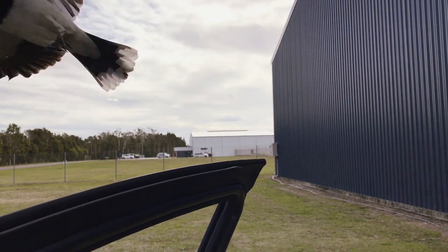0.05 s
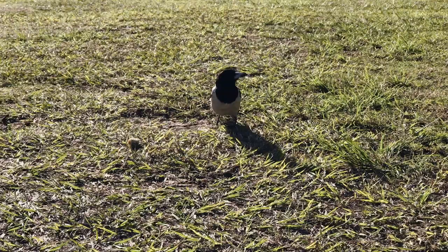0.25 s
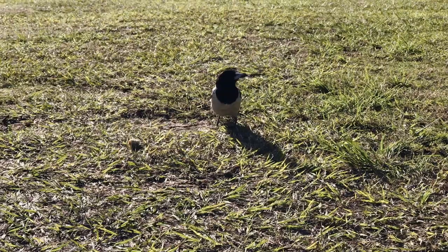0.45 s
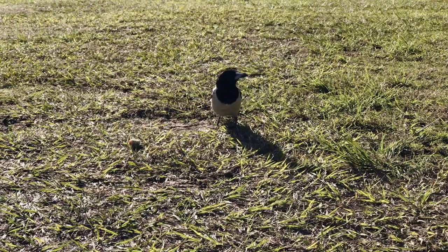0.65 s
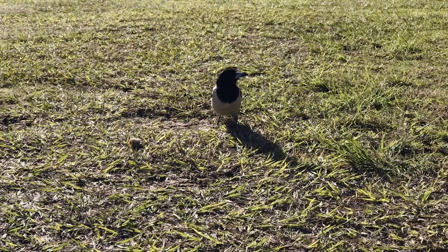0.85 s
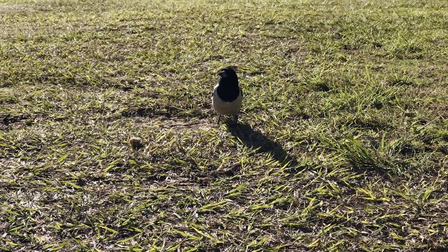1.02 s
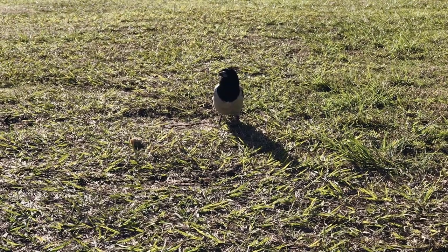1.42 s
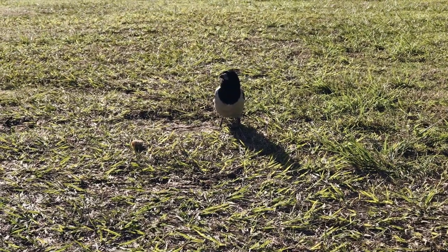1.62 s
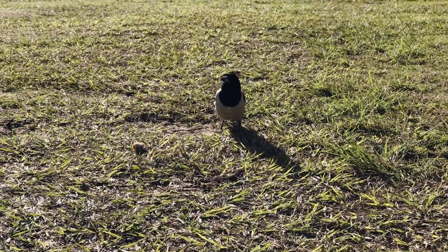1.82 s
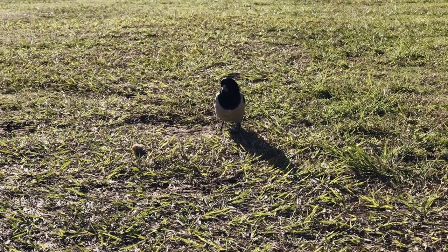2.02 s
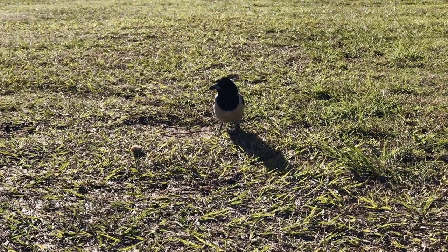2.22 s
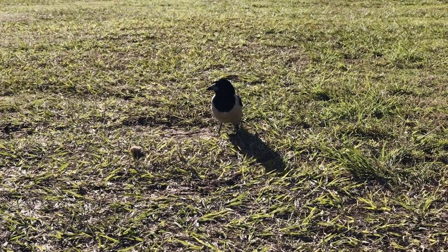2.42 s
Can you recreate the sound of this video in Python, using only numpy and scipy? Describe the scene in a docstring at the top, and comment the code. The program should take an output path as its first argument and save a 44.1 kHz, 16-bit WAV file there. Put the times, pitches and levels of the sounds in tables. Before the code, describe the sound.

A bird flutters off close by, its wings making low thumps of air with a light feather rustle from 0.2 to 0.3 seconds, just after one soft, short whistle. A faint hiss fades by 0.7 seconds, and two softer bumps come near 0.8. From 0.6 until the end at about 2.5 seconds, distant birds give quiet falling whistles, sharp chips and harsh calls, echoing slightly over a faint outdoor rumble.

```python
"""Over a faint outdoor rumble and a brief hiss, a butcherbird close by gives one soft, arched whistle.
It flutters off: its feathers rustle by friction and its wings push low buffets of air.
Other birds answer from farther off with falling whistles, harsh calls and sharp chips, reflected
by a shed wall and scattered by the surroundings. A second, softer pair of bumps comes near 0.8 s,
and the far birds call on to the end."""
import sys
import numpy as np
from scipy import signal
from scipy.fft import rfft, irfft
from scipy.io import wavfile
from scipy.ndimage import uniform_filter1d

SR = 44100
rng = np.random.default_rng(int(sys.argv[2]) if len(sys.argv) > 2 else 0)


def unload_wav(signal):
    """Save mono or channel-first audio to the path in sys.argv[1] as 16-bit WAV at rate SR, clipped to [-1, 1]."""
    wavfile.write(
        sys.argv[1],
        SR,
        np.round(np.clip(np.atleast_2d(signal).T, -1, 1) * 32767).astype(np.int16),
    )


N = 112454


def undb(db):
    """Amplitude ratio of a level in decibels."""
    return 10 ** (np.asarray(db) / 20)


def unit(x):
    """Normalisation to rms 1."""
    return x / np.sqrt(np.mean(x ** 2))


def curve(rows):
    """Linear interpolation between (t/s, value) rows."""
    return np.interp(np.arange(N) / SR, *np.array(rows).T)


def swells(rows):
    """Sum of Gaussian envelopes from (t/s, standard deviation/s, level/dB) rows."""
    t = np.arange(N) / SR
    return sum(undb(db) * np.exp(-.5 * ((t - at) / width) ** 2) for at, width, db in rows)


def colour(x, points):
    """Zero-phase filtering: the spectrum is multiplied by a curve through (f/Hz, gain/dB) points."""
    hz, db = np.array(points).T
    f = np.maximum(np.fft.rfftfreq(len(x), 1 / SR), 1)
    gain = undb(np.interp(np.log(f), np.log(hz), db))
    return irfft(rfft(x) * gain, len(x))


def noise(points):
    """Gaussian noise of rms 1, spectrally shaped by (f/Hz, level/dB) points."""
    return unit(colour(rng.standard_normal(N), points))


def wander(rate_hz):
    """Random modulation of rms 1: straight ramps between independent values."""
    hold = max(int(SR / rate_hz), 1)
    steps = np.repeat(rng.standard_normal(N // hold + 1), hold)
    return unit(uniform_filter1d(steps, hold)[:N])


def tail(x, t60_s):
    """Diffuse reverberation: convolution with exponentially decaying noise of unit energy."""
    t = np.arange(SR) / SR
    response = rng.standard_normal(SR) * np.exp(-np.log(1000) * t / t60_s)
    return signal.fftconvolve(x, response / np.linalg.norm(response))[:N]


def rumble():
    """Outdoor rumble: low-frequency noise under slow amplitude modulation."""
    # spectrum of the rumble: f/Hz, relative level/dB
    spectrum = [(20, -56), (32, -46), (50, -5.5), (90, -4), (140, -0.5), (200, 3.5), (290, 1), (420, -6),
                (600, -9.5), (850, -15.5), (1100, -17), (1600, -21), (2600, -23), (3800, -29), (5300, -34),
                (7300, -39.5), (12000, -45.5), (15500, -45.5)]
    # its gentle swells: t/s, level/dB
    envelope = [(0, -71), (.6, -69.5), (.75, -64.5), (.98, -69.5), (1.28, -66.5), (1.4, -70), (1.7, -67),
                (2.1, -67.5), (2.55, -67.5)]
    flicker_db = 0.7
    return noise(spectrum) * undb(curve(envelope) + flicker_db * wander(11))


def hiss():
    """Broadband noise whose envelope rises at the start and drops away near 0.65 s."""
    # spectrum of the hiss: f/Hz, relative level/dB
    spectrum = [(60, -28), (200, -11), (380, 2), (520, 3), (800, -3), (1100, -3.5), (1600, -9), (2600, -14),
                (4100, -17), (5600, -19), (7700, -24), (9000, -21.5), (10400, -30), (12500, -24),
                (15500, -23)]
    # its rise and fall: t/s, level/dB
    envelope = [(0, -91), (.05, -77), (.09, -68.5), (.33, -68.5), (.5, -70.5), (.648, -72), (.675, -100)]
    return noise(spectrum) * undb(curve(envelope))


def tone(hz, octave_db=-39):
    """A nearly pure bird tone with a faint second harmonic; phase is the integral of frequency."""
    phase = 2 * np.pi * np.cumsum(hz) / SR
    return np.sqrt(2) * (np.sin(phase) + undb(octave_db) * np.sin(2 * phase))


def butcherbird():
    """Frequency and amplitude modulation of one tone: an arched whistle that swells on its way down."""
    # fundamental of the whistle: t/s, f/Hz
    pitch = [(0, 1110), (.02, 1410), (.042, 1450), (.062, 1370), (.08, 1242), (.098, 1293), (.106, 1020),
             (.125, 1043)]
    # its envelope: t/s, level/dB
    envelope = [(0, -71.5), (.018, -60.5), (.036, -60), (.05, -66.5), (.056, -49.5), (.07, -47.5),
                (.088, -62.5), (.101, -81), (.106, -56), (.113, -62), (.125, -73)]
    end_s, fade_s = envelope[-1][0], 0.007
    fade = np.clip((end_s - np.arange(N) / SR) / fade_s, 0, 1)
    return tone(curve(pitch)) * undb(curve(envelope)) * fade


def far_whistle(hz, rough_db=-6):
    """A clear tone with a rough edge of narrow-band noise; being incoherent, the two add in power."""
    voice = tone(hz) + undb(rough_db) * hoarse(hz, half_width_hz=190)
    return voice / np.hypot(1, undb(rough_db))


def hoarse(hz, half_width_hz=534):
    """A harsh voice: random modulation of amplitude and phase spreads a tone into a band."""
    band = [(half_width_hz / 2, 0), (half_width_hz, -6),
            (2 * half_width_hz, -30), (10 * half_width_hz, -90)]  # offset f/Hz, level/dB
    in_phase = unit(colour(rng.standard_normal(SR // 4), band))[:len(hz)]
    quadrature = unit(colour(rng.standard_normal(SR // 4), band))[:len(hz)]
    phase = 2 * np.pi * np.cumsum(hz) / SR
    return in_phase * np.sin(phase) + quadrature * np.cos(phase)


def far_birds():
    """Frequency glides, clear or harsh, heard as the superposition of direct and reflected sound."""
    # falling whistles: t/s, duration/s, start f/Hz, end f/Hz, level/dB,
    # bend (above 0 glides early), gain into the echoes/dB
    whistles = [ (0.057, 0.044, 5750, 4320, -82, 1.5, -3), (.098, 0.023, 4260, 4020, -74, .5, -18),
                (.23, 0.022, 3295, 2950, -79.5, 0, 6.5), (.626, 0.083, 4150, 3370, -74.5, 3.5, -5),
                (.655, 0.037, 4130, 3670, -74, .3, -1), (.7, 0.052, 3810, 3516, -69.5, 0.1, -3),
                (0.713, 0.095, 3115, 2816, -73, 4, -0.5), (0.778, 0.058, 2950, 2137, -71, -2, -5.5),
                (.808, 0.073, 2070, 1916, -67.5, 1, -8), (0.782, 0.11, 3234, 1950, -65, 0, -17.5),
                (0.994, 0.061, 5120, 4750, -76, -3.2, -1), (1.008, .075, 5440, 4580, -72, 1.6, -5),
                (1.05, 0.052, 4350, 3800, -72.5, 3, 8), (1.017, 0.12, 4550, 3236, -74.5, 2.4, -2),
                (1.088, .09, 4036, 3420, -63.5, 2, -13), (1.197, 0.076, 2974, 1814, -65, 0.3, -6),
                (1.228, 0.041, 2965, 2540, -57.5, 1, -27.5), (1.266, .036, 2500, 2066, -68.5, 1.2, -13),
                (1.422, 0.091, 3420, 3200, -71, 6.7, -14), (1.531, 0.046, 4050, 3410, -68.5, 2.5, -10),
                (1.578, 0.029, 2980, 2570, -76, 2, -10), (1.613, 0.034, 3150, 2570, -73.5, 0, 1),
                (1.593, 0.12, 2190, 2072, -72.5, -1, -2.5), (1.665, .045, 2163, 1804, -70, 0.5, 2),
                (1.604, .11, 4780, 3330, -67.5, 1.5, -1), (1.622, 0.027, 5540, 5220, -80, -0.5, 3),
                (1.642, 0.064, 4420, 3840, -70.5, 0.5, -9), (1.659, .04, 5620, 5190, -80.5, .8, 12),
                (1.692, .095, 3960, 3140, -63.5, 1.5, -6.5), (1.843, 0.029, 3080, 2560, -79, 0, -1),
                (1.878, 0.037, 3220, 2400, -77.5, -0.5, 1), (1.88, 0.1, 4740, 3300, -68, 2.5, -5),
                (1.9, 0.1, 6380, 5260, -79, 3, 7.5), (1.956, 0.058, 3720, 3330, -65, 2.3, -6),
                (2.143, 0.043, 4650, 3720, -84.5, 8.5, 17), (2.24, 0.066, 3640, 3304, -67.5, 0, -1.5),
                (2.39, 0.039, 3050, 2220, -80, -1, -5), (2.422, 0.042, 3130, 2200, -75.5, .4, -20),
                (2.422, 0.14, 4600, 3240, -72.5, 2.6, -1), (2.447, .03, 4840, 4530, -79.5, 4.5, -5),
                (2.478, 0.068, 4490, 3466, -64, 3.5, 1), (2.485, 0.036, 4800, 4050, -73.5, 2.3, 3)]
    # quick chips, a few of them rising: columns as above
    chips = [ (0.719, 0.025, 4980, 5970, -73, 1.2, -11), (.742, .016, 5310, 5700, -70.5, 1.8, -30),
             (.743, 0.0067, 3600, 4420, -64.5, 0.2, -17), (1.483, 0.022, 4690, 2900, -61.5, 2.4, -4),
             (1.488, 0.016, 5750, 5280, -77.5, 0.8, 2), (1.507, 0.02, 5750, 4980, -72, .4, -7.5),
             (1.518, 0.012, 4450, 3550, -68, 1.0, -5.5), (1.527, 0.0087, 3600, 2980, -58, -0.75, -12),
             (1.677, 0.032, 5620, 4000, -68.5, 1.5, 3), (1.917, .018, 5790, 4910, -69.5, 1.2, 4),
             (2.026, .011, 4010, 2730, -56.5, -0.13, -6), (2.117, 0.033, 3870, 2586, -58.5, -0.64, -4.5),
             (2.181, 0.024, 4400, 3820, -65, 1.2, -4.5), (2.188, .05, 4050, 1996, -53.5, 1.1, -13),
             (2.219, 0.033, 3350, 2247, -64, 1.7, -21), (2.31, 0.0072, 5940, 3880, -80.5, -0.16, -5),
             (2.339, 0.0093, 6000, 5250, -84.5, .6, -1), (2.35, 0.01, 4540, 3770, -78, -0.0052, 1),
             (2.359, 0.011, 3760, 3330, -62.5, 0.77, -15), (2.47, 0.0076, 4490, 3770, -62, 0.74, -11)]
    # harsh falling calls: columns as above
    rasps = [ (.69, 0.12, 3780, 2766, -76, .2, 0), (1.025, 0.11, 4890, 3705, -67, 1.4, -8),
             (1.045, 0.055, 6820, 6300, -87, 0.39, -1), (1.08, 0.12, 4200, 3556, -69, 0.798, -3.5),
             (1.42, 0.1, 6440, 5930, -96, 0.78, 4), (1.672, 0.15, 5000, 4070, -70.5, 0.92, -5.5),
             (1.65, .13, 3925, 2863, -75, 0.513, -5), (1.69, 0.049, 6900, 5900, -86, 0.55, 5),
             (1.925, .115, 5040, 3950, -66, 1.4, -2.5), (1.93, 0.096, 6350, 5540, -79.5, 0.49, -5),
             (1.98, .1, 3290, 2683, -73, .5, -1.5), (2.195, 0.081, 3855, 3140, -65.5, 1, -11)]
    slow_attack, chip_attack, release = 0.37, 0.3, 0.5  # fractions of a note's duration
    waver = 1 + 0.014 * wander(500)
    tremor = undb(1.5 * wander(160))
    direct, to_echoes = np.zeros((2, N + SR))
    calls = (whistles, far_whistle, slow_attack), (chips, tone, chip_attack), (rasps, hoarse, slow_attack)
    for rows, voice, attack in calls:
        for start, duration, start_hz, end_hz, db, bend, echo_db in rows:
            progress = np.linspace(0, 1, int(duration * SR))
            span = int(start * SR) + np.arange(len(progress))
            glide = np.cumsum(np.exp(-bend * progress))
            hz = (start_hz + (end_hz - start_hz) * glide / glide[-1]) * waver[span % N]
            ramp = np.clip(np.minimum(progress / attack, (1 - progress) / release), 0, 1)
            envelope = undb(db) * np.sin(np.pi / 2 * ramp) * tremor[span % N]
            note = envelope * voice(hz)
            direct[span] += note
            to_echoes[span] += undb(echo_db) * note
    return direct[:N] + echoes(to_echoes[:N])


def echoes(calls, wall_delay_s=0.021):
    """Specular reflection from the shed wall gives one delayed copy; the surroundings scatter the rest."""
    wall = undb(-12) * np.pad(calls, (int(wall_delay_s * SR), 0))[:N]
    scatter = undb(-8) * tail(calls, t60_s=0.19)
    field = undb(-3) * tail(calls, t60_s=0.4)
    return wall + scatter + field


def feathers():
    """Friction noise: feathers slide over each other in grainy swishes as their barbs snap past."""
    # feather strokes: t/s, Gaussian width/s, level/dB, tilt about the pivot/(dB per octave)
    strokes = [(.097, 0.0093, -72.5, 3), (.127, 0.017, -69.5, 10), (0.141, .003, -68, 3),
               (0.188, 0.0086, -68.5, -2.5), (.226, 0.0094, -61.5, -2.5), (.26, 0.013, -71.5, 2),
               (.29, 0.0083, -73, 7), (.345, .008, -85, 1)]
    # spectrum of the rubbing: f/Hz, relative level/dB
    spectrum = [(1000, -29), (3000, -4.5), (4200, 3.5), (6500, 2), (7700, -2), (9300, 1), (10300, -4),
                (12300, 7), (13500, 2.5), (15500, 0.5)]
    snaps_per_s, snap_spread_db, grain_db, pivot_hz = 450, 6.5, 1.5, 7000
    grain = unit(undb(grain_db * wander(652)))
    snapping = rng.random(N) < snaps_per_s / SR
    snaps = unit(snapping * undb(snap_spread_db * rng.standard_normal(N)))
    friction = grain * rng.standard_normal(N) + undb(-3.5) * snaps
    rustle = np.zeros(N)
    for at, width, db, tilt in strokes:
        tilted = [(hz, level + tilt * np.log2(hz / pivot_hz)) for hz, level in spectrum]
        rustle += swells([(at, width, db)]) * unit(colour(friction, tilted))
    return rustle


def bumps():
    """Buffets of air: pulses of one rarefaction and one compression, with a short ring and a low boom."""
    # pressure pulses: t/s, peak level before filtering/dB, centre f/Hz
    buffets = [(0.2096, -38.5, 370), (0.214, -30, 190), (0.225, -38, 200), (0.2471, -25.5, 410),
               (0.2486, -23, 720), (0.2498, -18.5, 249), (.2625, -29, 326), (.2705, -48, 390),
               (.2985, -36.5, 445), (.3015, -31.5, 244), (0.31, -37, 300), (0.8014, -39.5, 204),
               (.8075, -34.5, 133), (0.8114, -40, 390), (0.8153, -36.5, 242), (.855, -46.5, 252),
               (.861, -55, 320), (1.306, -55, 270)]
    # filter on the pulses and their ring: f/Hz, gain/dB
    bump_filter = [(25, -15), (50, -11.5), (90, -11.5), (140, 3.5), (250, -3), (400, 1), (550, 0), (720, 0),
                   (1000, -1.5), (1400, -5), (2000, -10.5), (3000, -12)]
    # filter that leaves the low boom: f/Hz, gain/dB
    boom_filter = [(25, -37), (50, 1), (80, 5.5), (140, -8.5), (400, -26.5), (2000, -58)]
    t, pulses = np.arange(N) / SR, np.zeros(N)
    for at, db, hz in buffets:
        phase = 2 * np.pi * hz * (t - at)
        pulses += undb(db) * phase * np.exp((1 - phase ** 2) / 2)  # derivative of a Gaussian
    ring = undb(-18.5) * tail(pulses, t60_s=0.08)
    boom = undb(-9.5) * colour(tail(pulses, t60_s=0.52), boom_filter)
    return colour(pulses + ring, bump_filter) + boom


def swirls():
    """Turbulence: air swirling around the bumps makes short bursts of low-frequency noise."""
    # bursts of swirling air: t/s, Gaussian width/s, level/dB
    bursts = [(.212, 0.016, -42.5), (.256, 0.013, -33.5), (.299, 0.009, -38.5), (.812, 0.015, -52),
              (.853, 0.0063, -48)]
    # spectrum of the swirling: f/Hz, relative level/dB
    spectrum = [(25, -28), (60, -2.5), (130, 8.5), (250, 6), (400, -0.5), (550, -13.5), (700, -16),
                (1000, -36), (1500, -34), (2500, -55), (6000, -82)]
    return swells(bursts) * noise(spectrum)


def scene():
    """Linear superposition of all sources in one channel."""
    return (butcherbird() + far_birds() + bumps() + swirls() + feathers() + rumble() + hiss())[None]


def record(dry, cutoff_hz=15700):
    """An elliptic low-pass filter cuts off the highest treble."""
    return signal.sosfilt(signal.ellip(10, .2, 70, cutoff_hz, fs=SR, output="sos"), dry)


dry = scene()
out = record(dry)
unload_wav(out)
```